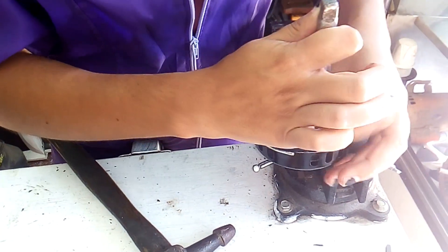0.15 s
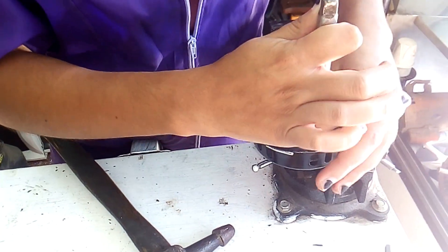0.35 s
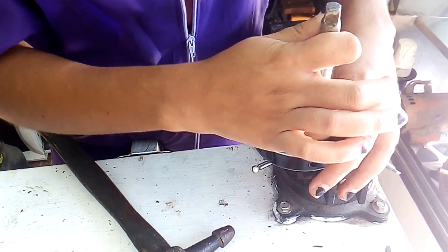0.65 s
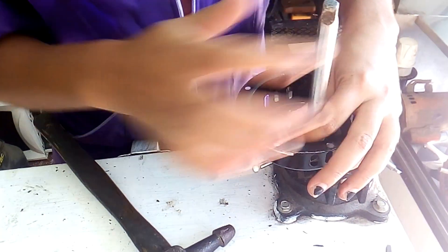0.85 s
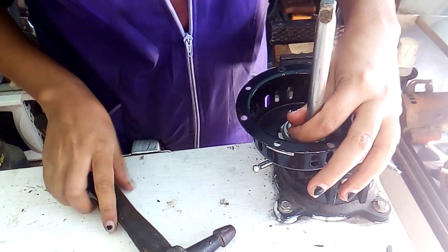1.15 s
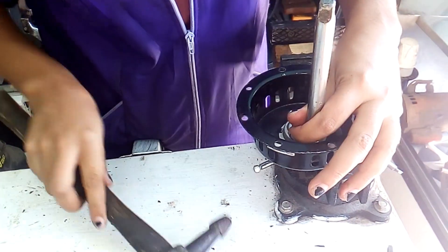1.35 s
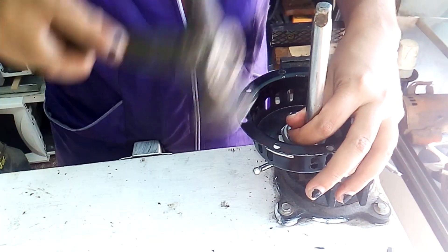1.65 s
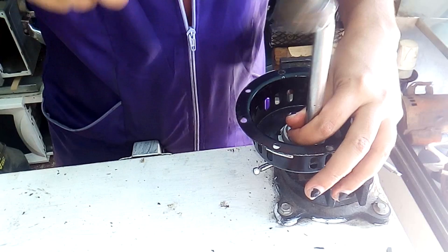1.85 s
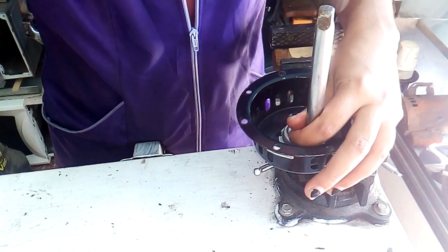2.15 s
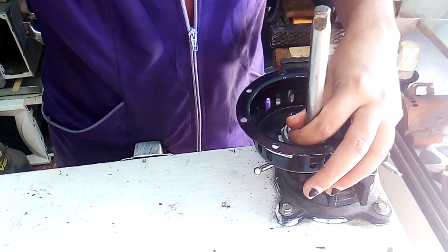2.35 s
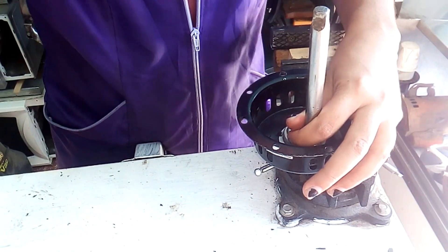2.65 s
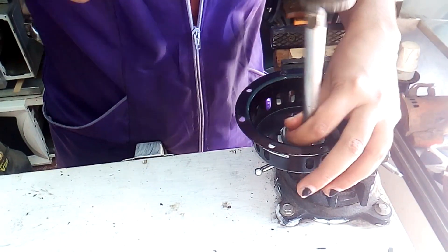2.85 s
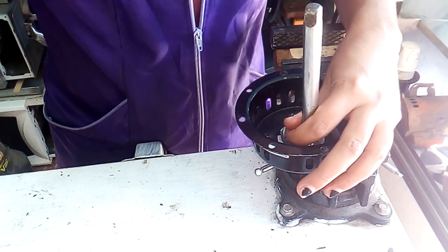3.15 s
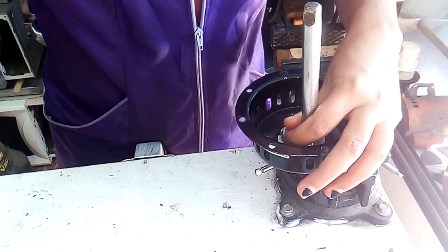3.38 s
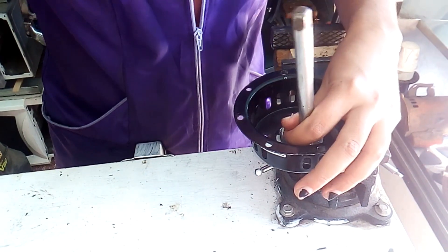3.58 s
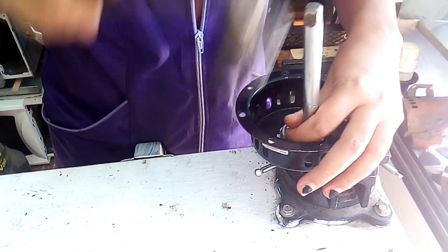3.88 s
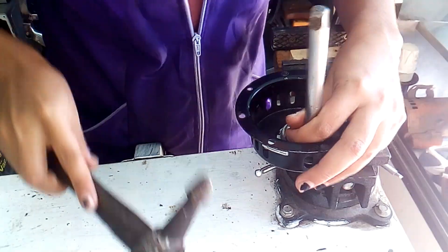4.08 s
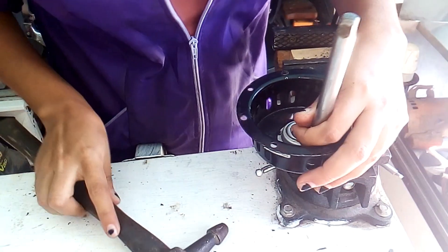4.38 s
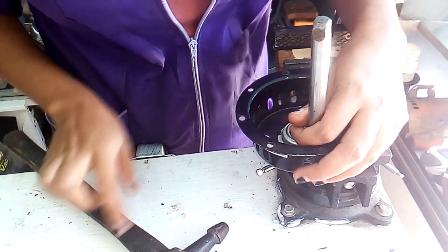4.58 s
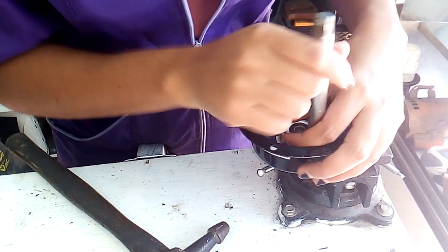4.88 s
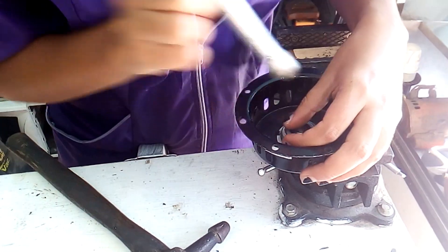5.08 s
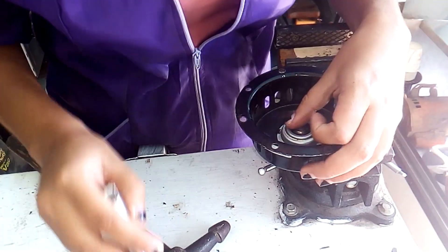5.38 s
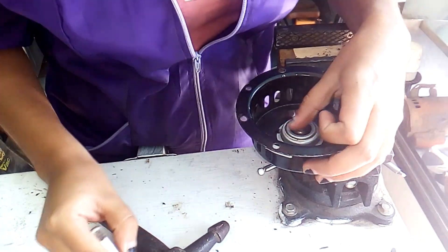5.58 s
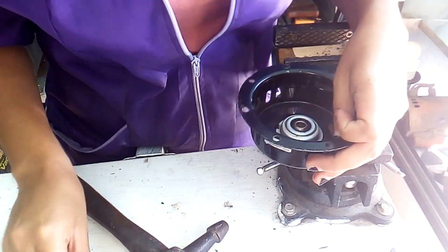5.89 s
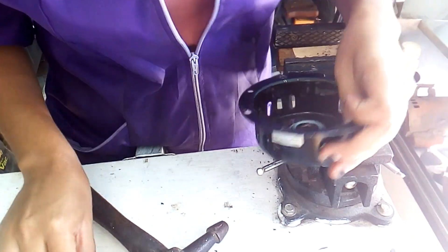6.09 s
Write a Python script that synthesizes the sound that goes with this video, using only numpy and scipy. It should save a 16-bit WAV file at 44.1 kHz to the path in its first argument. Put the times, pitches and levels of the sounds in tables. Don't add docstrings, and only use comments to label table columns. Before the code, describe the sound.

Small knocks and a light steel tap on a wooden bench, then three hard, distorting hammer blows on a metal punch, clattering set-downs, traffic swelling.

```python
import sys
import numpy as np
from scipy import signal
from scipy.io import wavfile

SR = 44100
rng = np.random.default_rng(int(sys.argv[2]) if len(sys.argv) > 2 else 0)


def waveform_to_disk(signal):
    frames = np.transpose(np.atleast_2d(signal))
    scaled = np.clip(frames, -1, 1) * 32767
    samples = np.round(scaled).astype(np.int16)
    wavfile.write(sys.argv[1], SR, samples)


def level_to_linear(level):
    exponent = np.asarray(level, float) / 20
    return 10 ** exponent


N = 274743


def at_hz(points, hz):
    point_hz, value = np.array(points).T
    return np.interp(np.log(hz), np.log(point_hz), value)


def in_time(rows):
    s, *columns = np.transpose(rows)
    return [np.interp(np.arange(N) / SR, s, column) for column in columns]


def rms_one(x):
    return x / np.sqrt(np.mean(x ** 2) + 1e-20)


def drift(rate_hz):
    knots = rng.standard_normal(int(rate_hz * N / SR) + 3)
    return np.interp(np.arange(N) / SR * rate_hz, np.arange(len(knots)), knots)


def filtered(x, order, hz, kind="low"):
    return signal.sosfilt(signal.butter(order, hz, kind, fs=SR, output="sos"), x)


def bands(length):
    white = rng.standard_normal((2, length))
    edges = 22 * 2 ** np.arange(0, 9.7, 1 / 3)
    for k, (low, high) in enumerate(zip(edges, edges[1:])):
        yield np.sqrt(low * high), filtered(white[k % 2], 3, [low, high], "band")


def clicks(times, levels_db):
    force = np.zeros(N)
    force[np.round(np.asarray(times) * SR).astype(int)] = level_to_linear(levels_db)
    return force


def ring(force, hz, t60):
    r = level_to_linear(-60 / (t60 * SR))
    w = 2 * np.pi * hz / SR
    return signal.lfilter([0, np.sin(w)], [1, -2 * r * np.cos(w), r * r], force + 1e-18)


def strike(modes, times, levels_db):
    at = np.round(np.atleast_1d(times) * SR).astype(int)
    out = np.zeros(N)
    luck_db = 3.5 * rng.standard_normal((len(at), len(modes)))
    for k, (hz, mode_db, t60) in enumerate(modes):
        force = np.zeros(N)
        force[at] = level_to_linear(levels_db + mode_db + luck_db[:, k]) * (-1) ** k
        out += ring(force, hz, t60)
    return out


# start_s, blow_db, long_ring_db, bench_thud_db
HAMMER_BLOWS = [
    (2.272, 9, -17.5, 3.5),
    (2.926, 14, 10, 4),
    (3.593, 14, -15.5, 4.5),
]
# pitch_hz, level_db, t60_s
STEEL_MODES = [(1378, -6, .05), (1485, -4, .06), (1590, -5, .04), (1720, 0, .025), (1853, -5, .05),
               (1934, -4, .04), (2195, -8, .05), (3000, -6, .04), (3238, -6, .05), (3900, -3, .03),
               (4270, -2, .04), (4653, -4, .05), (5330, -7, .04), (5480, -4, .03), (5780, -5, .02),
               (6100, -7, .04), (7350, -6, .05), (7525, -5, .05)]
# pitch_hz, level_db, t60_s
PUNCH_RING_MODES = [(10420, -28, .10), (10530, -28, .16), (13000, -30, .05)]
# pitch_hz, level_db, t60_s
BENCH_MODES = [(89, -9.5, 0.21), (171.2, -1, 0.073), (223.4, -7, 0.2), (291, -3, 0.049), (380, -3.5, 0.053),
               (598, -4, 0.015), (693, -9, 0.13), (1000, 8, 0.01), (1246, 1, 0.06), (1820, -4, 0.018),
               (2180, -12, 0.011)]


def hammer():
    out = np.zeros(N)
    for s, blow_db, ring_db, thud_db in HAMMER_BLOWS:
        steel = strike(STEEL_MODES, s, blow_db - 10) + strike(PUNCH_RING_MODES, s, blow_db + ring_db)
        bench = strike(BENCH_MODES[:6], s + 0.00282, blow_db + thud_db - 25)
        out += steel + bench
        out += workshop(level_to_linear(-11) * steel + level_to_linear(-4.5) * bench, ECHO_COLOUR_DB)
        out += workshop(clicks(s, blow_db + 11.0), CASTING_COLOUR)
    s, blow_db = np.transpose(HAMMER_BLOWS)[:2]
    return out + rattle(s, blow_db - 0.5, t60=0.047)


# pitch_hz, level_db
CASTING_COLOUR = [(150, -15.5), (500, -9), (900, -4.5), (1500, 0.5), (2400, -1.5), (4000, -1.5), (6000, -2),
                  (7500, -2), (10000, -13), (13000, -7), (16000, 2)]


def rattle(times, levels_db, t60):
    fade = signal.lfilter([1], [1, -level_to_linear(-60 / (t60 * SR))], clicks(times, levels_db) + 1e-18)
    colour = sum(level_to_linear(at_hz(CASTING_COLOUR, hz)) * noise for hz, noise in bands(N) if hz > 400)
    return fade * rms_one(colour)


# start_s, knock_db, pitch_hz, bench_ring_db, crack_db
BENCH_KNOCKS = [(0.462, -25, 750, 1, 0), (1.207, -13.5, 434, -32, -14), (1.226, -29.5, 380, -5, 3),
                (1.383, -18, 290, -6.5, -11.5), (1.402, -22.5, 262, -2.5, -13.5),
                (1.47, -16.5, 338, -18, -17.5), (1.492, -20, 340, -4, -11.5), (1.512, -39, 293, 11.5, -19),
                (4.332, 7, 300, -95, -10.5), (4.362, -4, 351, -19, -27), (4.45, 7.5, 326, -14, -9),
                (4.467, -9.5, 506, 1.5, -4), (4.5105, -0.5, 358, -26, -14), (4.525, -26, 290, -3, 6),
                (4.569, -12.5, 300, -9, -10.5), (4.664, -9.5, 630, 1.5, 6.5), (4.727, -7.5, 288, -4, -8),
                (4.745, -18.5, 406, 3, 1), (4.761, -24, 302.5, 2, -1), (5.339, -19, 605, -11, -6.5),
                (5.593, 1, 366, -30.5, -10.5), (5.633, -25.5, 352, 10.5, -11.5),
                (6.138, 4, 406, -33.5, -6.5)]


def tools_on_bench():
    s, knock_db, _, bench_db, _ = np.transpose(BENCH_KNOCKS)
    wood = strike(BENCH_MODES[1:7], s, knock_db + bench_db - 7.0)
    cracks, pushes = np.zeros(N), np.zeros(N)
    t = np.arange(3900) / SR
    for at, level_db, hz, _, crack_db in BENCH_KNOCKS:
        now = slice(round(at * SR), round(at * SR) + len(t))
        rise = 1 - np.exp(-t * hz / 0.29 * level_to_linear(0.52 * level_db))
        wood[now] += level_to_linear(level_db) * np.sin(2 * np.pi * hz * t) * level_to_linear(-60 * t * hz / 6.34) * rise
        dull = signal.butter(2, 1900 * 2 ** (0.03 * level_db), fs=SR)
        white = rng.standard_normal(len(t))
        crack = rms_one(signal.lfilter(*dull, white))
        cracks[now] += level_to_linear(level_db + crack_db - 3.5) * crack * level_to_linear(-60 * t / 0.064)
        buzz, tick = level_to_linear(-38.5 - 60 * t / 0.11), level_to_linear(-24.5 - 60 * t / 0.014)
        cracks[now] += level_to_linear(1.3 * level_db) * white * (buzz + tick)
        pushes[now] += level_to_linear(level_db + crack_db - 27.5) * rms_one(signal.lfilter(*dull, t == 0))
    steel, scrape = taps(), drag()
    to_walls = level_to_linear(-12) * wood + level_to_linear(-22) * steel + level_to_linear(-9.0) * scrape + pushes
    both = wood + steel + scrape + cracks + workshop(to_walls, ECHO_COLOUR_DB)
    frame = ring(clicks(s, knock_db - 40), hz=38, t60=0.25)
    return frame + filtered(both, 2, 140, "high")


# start_s, rise_s, hold_s, fall_db_per_s, level_db
HOUSING_DRAGS = [
    (-0.004, 0.083, 0.069, 57, -39),
    (0.397, 0.055, 0.076, 124, -27),
]


def drag():
    slips = (rng.random(N) < 600 / SR) * level_to_linear(0.56 * np.minimum(rng.exponential(1, N), 4))
    slips = slips * rng.choice([-1, 1], N)
    body = np.zeros(N)
    for hz, mode_db, t60 in BENCH_MODES[1:]:
        body += level_to_linear(mode_db) * ring(slips, hz, 0.19 * min(t60, .08)) / (1 + (hz / 1200) ** 2)
    hiss = filtered(rng.standard_normal(N), 3, [1500, 6000], "band")
    t = np.arange(N) / SR
    push = np.zeros(N)
    for at, rise, hold, fall, level_db in HOUSING_DRAGS:
        fallen_db = fall * np.maximum(t - at - rise - hold, 0)
        push += np.clip((t - at) / rise, 0, 1) ** 2 * level_to_linear(level_db - fallen_db)
    return push * (rms_one(body) + level_to_linear(-19.5) * rms_one(hiss))


# (pitch_hz, level_db)
STEEL_TAPS = [
    (0.161, -39, [(4600, 9), (5050, 6), (8000, 3), (9700, 0), (11500, -10)]),
    (1.922, -22.5, [(1500, 3), (1750, -0.5), (3040, -4.5), (3810, -3.5), (5290, -6), (5900, -17), (6550, -10.5), (7960, -8.5), (11050, -19.5)]),
    (4.6659, -11, [(600, -10), (980, -4.5), (1400, -3), (2500, -1), (3950, 4), (5800, -23)]),
]
# start_s, level_db
PUNCH_SET_DOWN = [
    (5.593, -27),
    (6.138, -4),
]
# pitch_hz, level_db, t60_s
PUNCH_END_MODES = [(1950, 1.5, 0.0266), (2900, -24.5, 0.099), (3440, -17, 0.0435), (4700, -29, 0.088),
                   (5150, -40, 0.18), (5440, -27, 0.056), (7060, -29, 0.039), (8463, -38, 0.042)]


def taps():
    out = np.zeros(N)
    for at, tap_db, modes in STEEL_TAPS:
        for hz, mode_db in modes:
            out += strike([(hz, mode_db, .02)], at + .0012 * rng.uniform(-1, 1), tap_db)
    s, level_db = np.transpose(PUNCH_SET_DOWN)
    top_db = max(mode_db for _, mode_db, _ in PUNCH_END_MODES)
    return out + strike(PUNCH_END_MODES, s, level_db - top_db)


def tap_scatter():
    s, tap_db = np.transpose([tap[:2] for tap in STEEL_TAPS] + PUNCH_SET_DOWN)
    return workshop(clicks(s, tap_db + 6), CASTING_COLOUR)


# middle_s, length_s, centre_hz, level_db
FINGER_SWISH = (5.16, .06, 4800, -50)


def swish():
    at, length, hz, level_db = FINGER_SWISH
    noise = filtered(rng.standard_normal(N), 2, [hz / 1.15, hz * 1.15], "band")
    return level_to_linear(level_db) * rms_one(noise) * np.exp(-((np.arange(N) / SR - at) / length) ** 2)


# pitch_hz, t60_s
WORKSHOP_T60 = [(60, 0.52), (160, 0.4), (420, 0.38), (1100, 0.33), (2900, 0.34), (7500, 0.3), (9000, 0.3),
                (15000, 0.058)]
# pitch_hz, level_db
ECHO_COLOUR_DB = [(60, -2.5), (200, 0), (700, 2.5), (2000, -2.5), (6000, -5), (8000, 1.5), (15000, -24)]


def workshop(x, colour):
    t = np.arange(SR) / SR
    tail = np.zeros(SR)
    for hz, noise in bands(SR):
        t60 = at_hz(WORKSHOP_T60, hz)
        yard = level_to_linear(-11 - 60 * t / (0.74 * t60 / 0.46))
        tail += level_to_linear(at_hz(colour, hz)) * noise * (level_to_linear(-60 * t / t60) + yard)
    tail = tail * np.clip((t - .003) / 0.0095, 0, 1)
    return signal.fftconvolve(x, tail / np.sqrt(np.sum(tail ** 2)))[:N]


# time_s, pitch_hz, level_db
GEARBOX_WHINE = [(2.9, 2760, -74), (3.078, 2830, -51), (3.448, 2635, -43.5), (3.71, 2640, -30),
                 (3.804, 2680, -38.5), (4.022, 2780, -40), (4.286, 2490, -48.5), (4.5, 2650, -43)]


def whine():
    hz, level_db = in_time(GEARBOX_WHINE)
    t = np.arange(N) / SR
    fade = np.clip((t - 3.1) / 0.27, 0, 1) * np.clip((4.4 - t) / 0.36, 0, 1)
    return level_to_linear(level_db - 5) * fade * drift(450) * np.sin(2 * np.pi * np.cumsum(hz) / SR)


# time_s, traffic_db, lorry_nearness_db
STREET_COURSE = [(0.0, -40.5, 0.5), (0.6, -42, -3.5), (1.2, -44.5, -1), (1.9, -47.5, -1.5),
                 (2.7, -45, -1.5), (3.3, -44, -2), (3.6, -40.5, 9), (4.0, -41, 10), (4.4, -38, 12),
                 (4.9, -37, 9.5), (5.3, -35, 8.5), (5.6, -35.5, 5.5), (5.85, -31.5, 6), (6.23, -32, 2)]
# pitch_hz, level_db_per_hz
TRAFFIC_COLOUR = [(20, -8), (50, -4), (80, -4), (200, 0), (450, -3), (700, -2), (1500, -4), (2200, -10),
                  (2800, -16), (4300, -21), (5300, -25), (6200, -29), (7200, -36), (8000, -46)]
# offset_db, share_of_level, share_of_nearness
TRAFFIC_LAYERS = [
    (-24, 1.6, 1.2),
    (-8, 1.46, .1),
    (0, 0.99, 0.024),
    (-14, 0.95, 0.8),
    (-20, 0.35, .4),
]
# time_s, level_db
ENGINE_DRONE = [(0, -93), (2.1, -71), (2.3, -43.5), (2.8, -52), (3.3, -41.5), (3.55, -54), (4.1, -46.5),
                (4.5, -53), (5.2, -44), (6.0, -38.5), (6.23, -44.5)]


def street():
    level_db, near_db = in_time(STREET_COURSE)
    layers = np.zeros((5, N))
    for hz, noise in bands(N):
        layer = np.searchsorted([90, 450, 2500, 4300], hz)
        layers[layer] += level_to_linear(at_hz(TRAFFIC_COLOUR, hz) + 1.33 * drift(9.2)) * noise
    layers[:2] *= level_to_linear(3.5 * drift(4.25))
    mean_db = level_db.mean()
    wash = np.zeros(N)
    for (offset_db, follow, near), layer in zip(TRAFFIC_LAYERS, layers):
        layer_db = mean_db + offset_db + follow * (level_db - mean_db) + near * near_db
        wash += level_to_linear(layer_db) * rms_one(layer)
    drone_hz, width_hz = 124.4, 6.9
    drone = ring(rng.standard_normal(N), drone_hz, 1.3 / width_hz)
    drone = ring(drone, drone_hz, 1.4 / width_hz)
    return wash + level_to_linear(in_time(ENGINE_DRONE)[0]) * rms_one(drone)


def scene():
    near = hammer() + tools_on_bench() + tap_scatter() + swish()
    return (near + whine() + street())[None]


def band_limit(x):
    return signal.sosfilt(signal.butter(12, 15860, fs=SR, output="sos"), x)


def record(dry):
    step_hz, top_db, hiss_db, end_hz = 7440, -10, -72, 15000
    x = filtered(dry, 1, 40, "high")
    below = filtered(x, 8, step_hz)
    above = filtered(x, 4, step_hz, "high")
    hiss = level_to_linear(hiss_db) * rng.standard_normal(dry.shape)
    clipped = np.clip(below + level_to_linear(top_db) * above + hiss, -1, 1)
    return band_limit(filtered(clipped, 2, end_hz))


dry = scene()
out = record(dry)
waveform_to_disk(out)
```